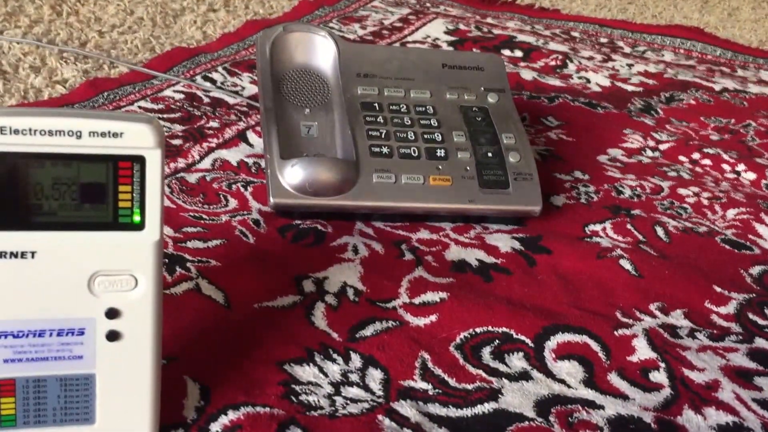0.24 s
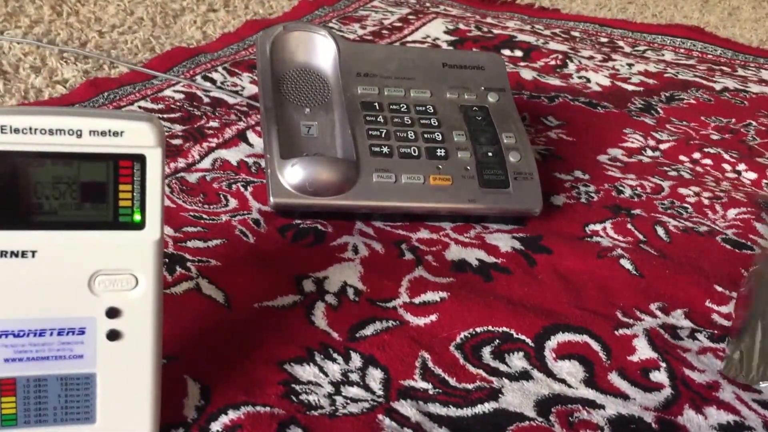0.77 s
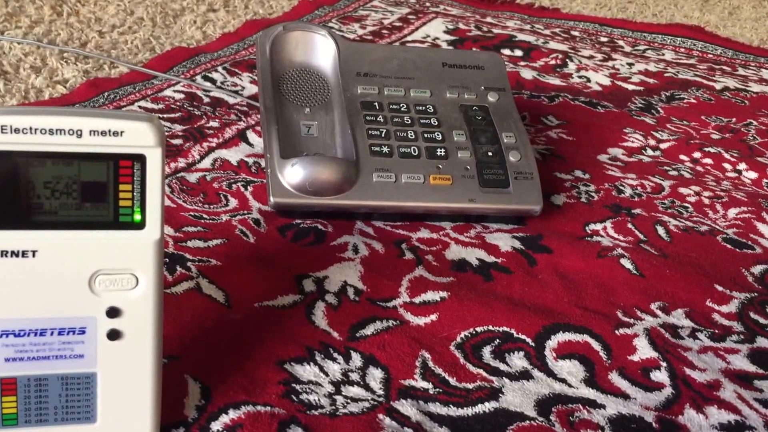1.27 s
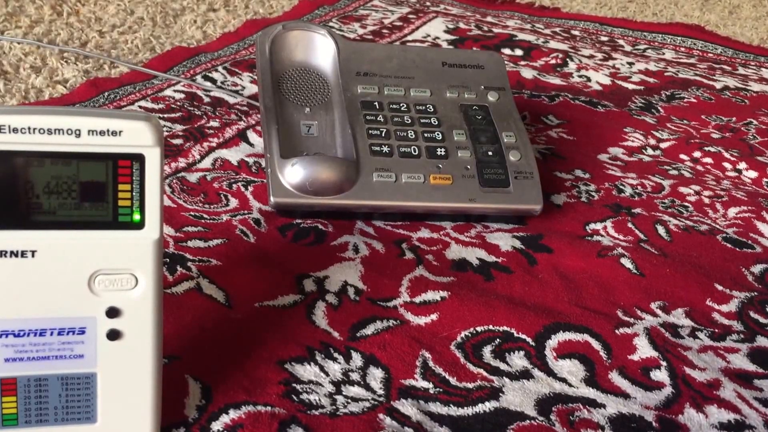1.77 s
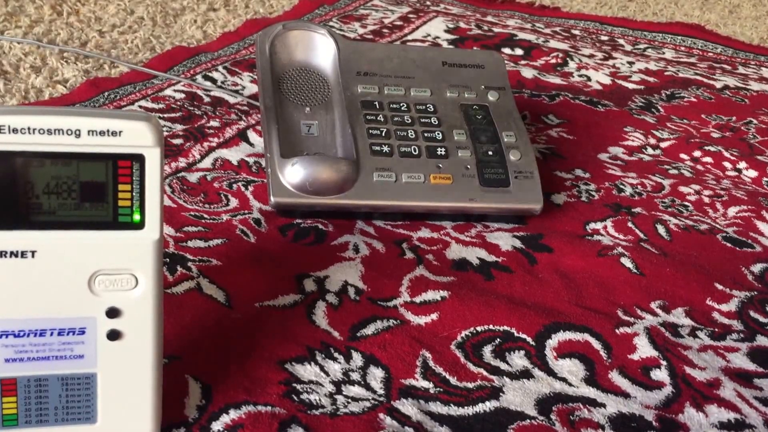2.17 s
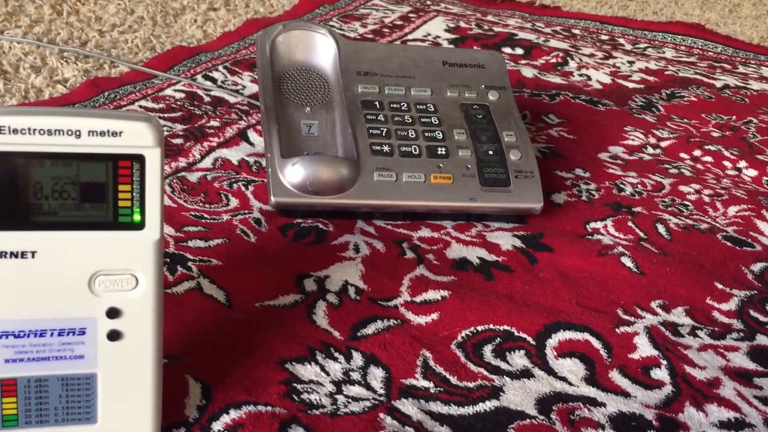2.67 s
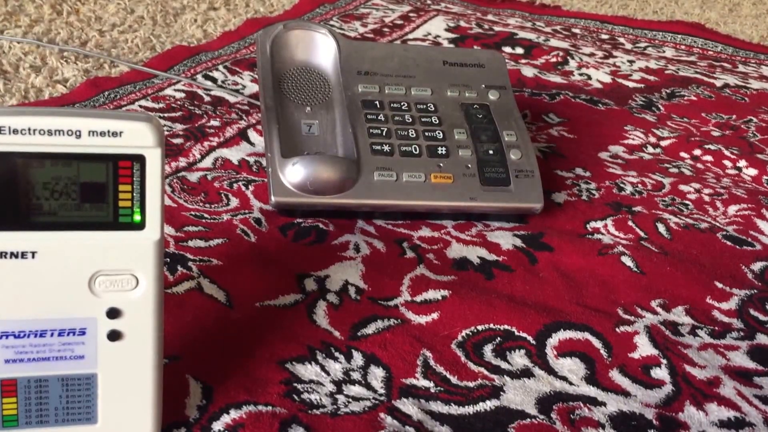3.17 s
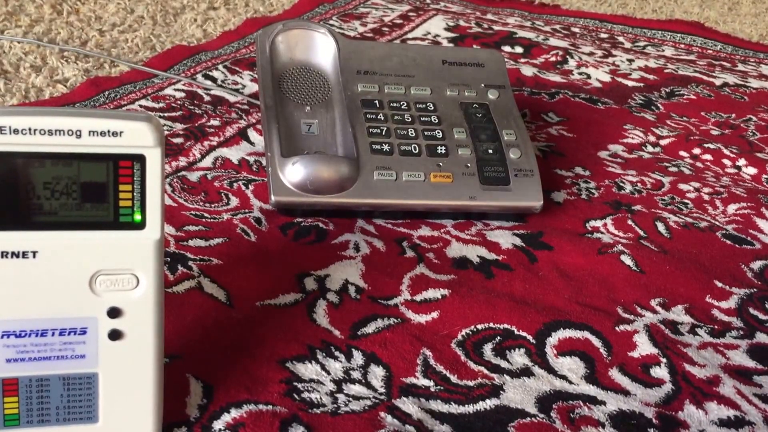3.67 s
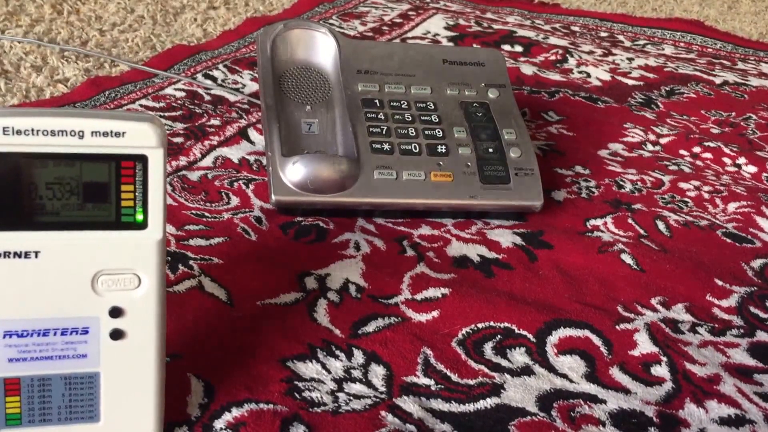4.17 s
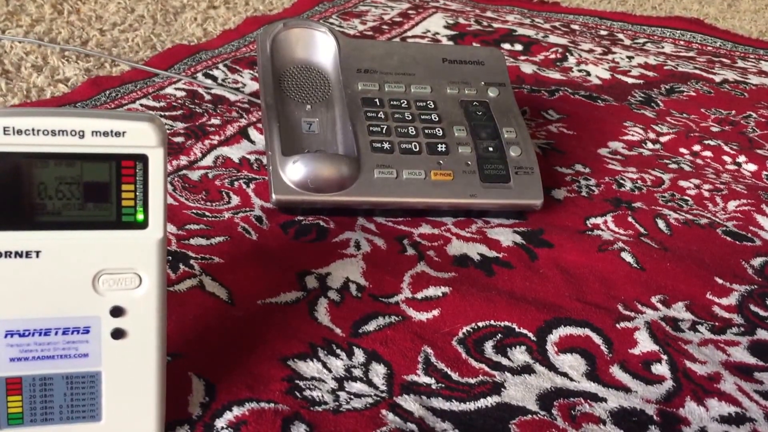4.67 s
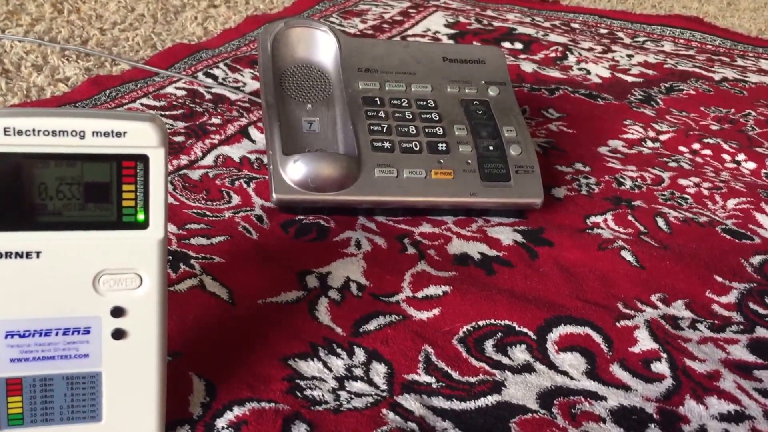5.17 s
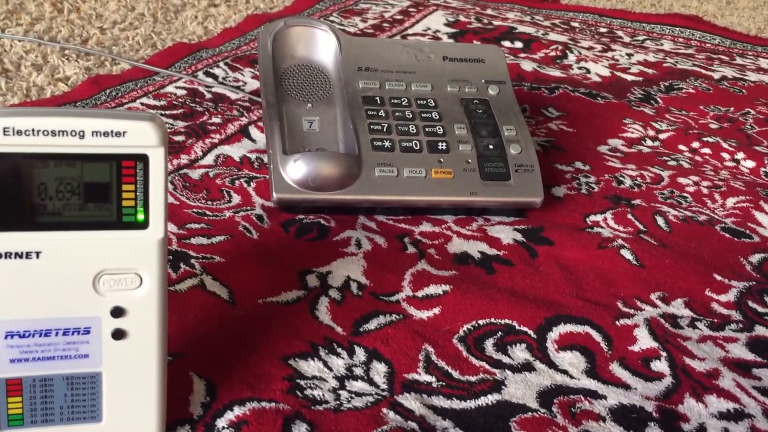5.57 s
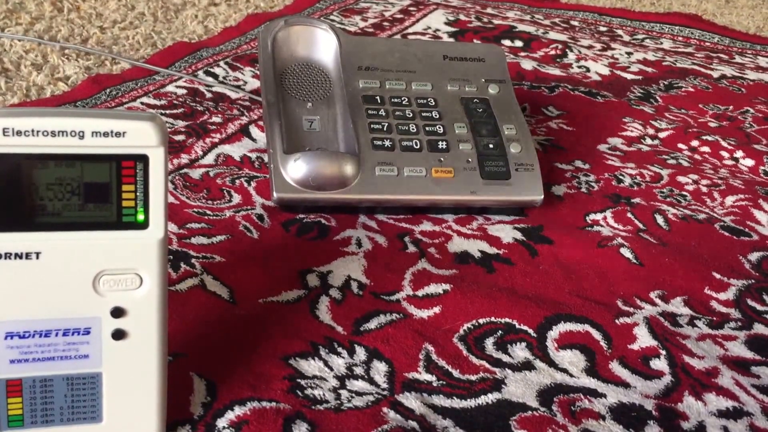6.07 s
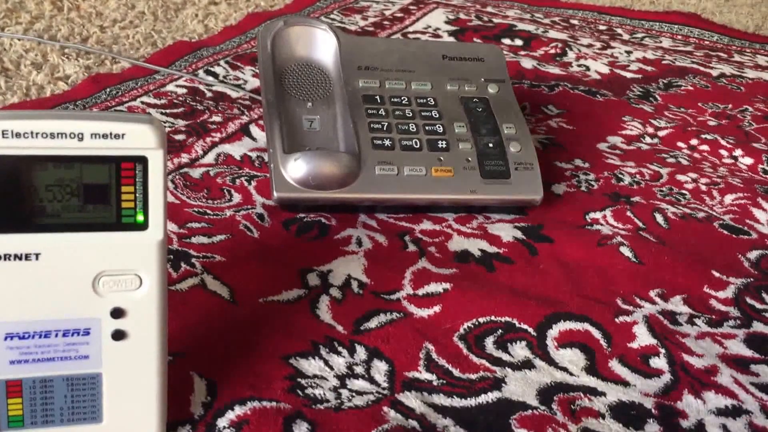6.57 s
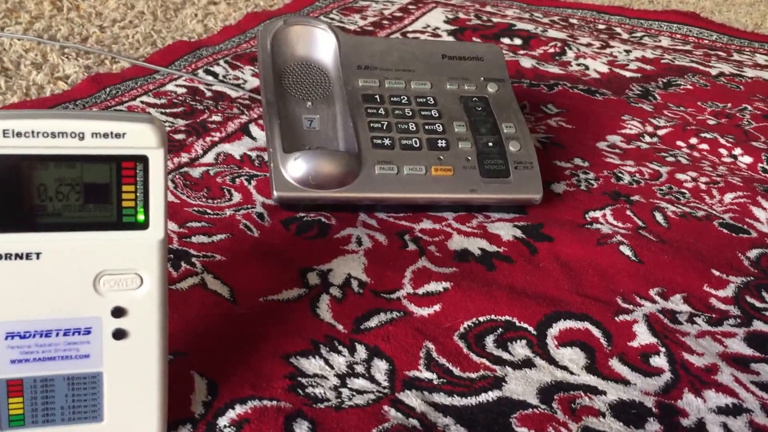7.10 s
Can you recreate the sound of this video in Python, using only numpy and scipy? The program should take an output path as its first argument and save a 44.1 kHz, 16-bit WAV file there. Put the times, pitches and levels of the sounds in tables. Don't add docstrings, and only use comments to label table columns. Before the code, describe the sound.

A thin metallized plastic blanket is shaken open by hand, close to a small microphone in a soft, carpeted room. From 0 s it crinkles lightly, with tiny ticks and a few flicks around 0.4-0.8 s. A sharp surge of snapping peaks just before 1 s, then uneven rustling continues with scattered pops to about 2.3 s. From 2.4 to 3 s the sheet is quieter, in short finger flicks. A bright fold cracks at 3.2 s, and a strong, full shake swells around 3.6 s with soft humming of stretched film, easing through 4.2 s. Smaller pulls follow until another big shake near 5.9 s, with low air thumps and the loudest pop at 6 s. Crackling then thins, with deep soft puffs near 6.8 s and a fresh crinkle at 7 s, still rustling at the end. Echo is short and faint; slight rumble and hiss lie underneath.

```python
import sys
import numpy as np
from scipy import signal
from scipy.fft import rfft, irfft, next_fast_len
from scipy.io import wavfile
from scipy.ndimage import uniform_filter1d, map_coordinates

SR = 44100
rng = np.random.default_rng(int(sys.argv[2]) if len(sys.argv) > 2 else 0)


def level_to_linear(level):
    exponent = np.asarray(level, float) / 20
    return 10 ** exponent


def store_pcm(level_fs):
    pcm = np.round(np.clip(level_fs, -1, 1) * 32767).astype(np.int16)
    wavfile.write(sys.argv[1], SR, np.atleast_2d(pcm).T)


N = 323694

# pitch_hz, level_db [dB per Hz]
FOIL_COLOUR = [(210, -34), (350, -11.5), (502, -17), (912, -1.5), (1510, -2.5), (2030, -4.5), (4890, -4.5),
               (8880, -4.5), (10400, -8), (12000, -8), (14900, -10)]
# time_s, tension [0 slack to 1 tight], extra_brightness_db of the finest folds,
# swing_db of the moving air
HOLD_OVER_TIME = [(0, .9, 2, 0.5), (.4, 1, -1.5, 2), (.6, 0.5, 0.5, 3.5), (1.2, 0.4, 0, -4),
                  (2.1, 0.3, -1, -4.5), (2.35, 0.6, 0, 0), (2.5, 0.1, 2, -0.5), (3, 0.14, 0.5, -2.5),
                  (3.6, 0.4, -0.5, 2.5), (4.4, 0.3, -0.5, 1), (4.8, 1, 0, 0.5), (5.5, 1, 0, 1),
                  (6.1, 0.8, 0.5, 5.5), (6.5, 0.54, 2.5, -0.5), (6.9, 0.85, 3, 7), (7.34, 1, -0.5, 3.5)]
# pitch_hz, width_hz, level_db
PANEL_RINGING = [(1990, 170, 5), (2550, 900, 5.5)]
SLACK_HZ, SPLIT_HZ = 1666, 3570


def unit(x):
    return x / np.sqrt(np.mean(x ** 2) + 1e-20)


def along(points, hz):
    f, v = np.transpose(points)
    return np.interp(np.log(hz + 1), np.log(f + 1), v)


def curves(rows):
    s, *columns = np.transpose(rows)
    return [np.interp(np.arange(N) / SR, s, column) for column in columns]


def wobble(rate_hz):
    knots = rng.standard_normal(int(N * rate_hz / SR) + 4)
    return map_coordinates(knots, [np.arange(N) * rate_hz / SR])


def coloured(x, spectrum, side=lambda hz: 1):
    m = next_fast_len(N + 8192)
    hz = np.fft.rfftfreq(m, 1 / SR)
    gain = level_to_linear(along(spectrum, hz)) * side(hz)
    cepstrum = irfft(np.log(gain + 1e-6), m)
    cepstrum[1:m // 2] *= 2
    cepstrum[m // 2 + 1:] = 0
    return irfft(rfft(x, m) * np.exp(rfft(cepstrum)), m)[:N]


def below(hz, edge_hz=SPLIT_HZ):
    return 1 / np.sqrt(1 + (hz / edge_hz) ** 12)


def above(hz, edge_hz=SPLIT_HZ):
    return np.sqrt(1 - below(hz, edge_hz) ** 2)


def patchy_noise(patchy_db):
    z = signal.stft(rng.standard_normal(N), nperseg=256)[2]

    def patches(wide, long):
        across_pitch = uniform_filter1d(rng.standard_normal(z.shape), wide, 0)
        return unit(uniform_filter1d(across_pitch, long, 1))

    field = patches(4, 4) + patches(6, 40)
    return unit(signal.istft(z * level_to_linear(patchy_db * field), nperseg=256)[1][:N])


def grains(count, size, lo_hz, hi_hz, cycles, spread_db, bustle):
    when, pitch, loud, life, phase = rng.random((count, 5)).T[:, :, None]
    crowd = np.cumsum(bustle)
    start = np.searchsorted(crowd, when * crowd[-1])
    hz = lo_hz + pitch * (hi_hz - lo_hz)
    t = np.arange(size) / SR
    decay = hz / (cycles * (0.22 + 0.87 * life))
    level_db = np.minimum(-spread_db * np.log(loud), 4 * spread_db)
    strength = level_to_linear(level_db) * np.sqrt(decay)
    rings = strength * np.exp(-decay * t) * np.sin(2 * np.pi * (hz * t + phase))
    places = start + np.arange(size)
    return unit(np.bincount(places.ravel(), rings.ravel(), N + size)[:N])


def hands():
    # peak_s, level_db, rise_s, fall_s (over about 10 dB), slackness_db
    pulls = [(0.0, -52, .1, 0.13, -1.5), (.105, -70, 0.12, 0.4, -1), (.5, -48.5, 0.15, .16, 1),
             (.988, -35, .13, .025, 1.5), (1.045, -46, .08, 0.1, -4), (1.25, -43.5, .17, 0.41, 3.5),
             (1.84, -46.5, 0.34, 0.55, 1.5), (2.035, -38.5, 0.11, .08, 4), (2.31, -43, 0.1, 0.2, 0.5),
             (3.08, -45.5, 0.13, 0.1, 0.5), (3.3, -42, 0.14, .045, 6), (3.635, -32.5, 0.21, 0.28, -3),
             (3.93, -36.5, 0.17, 0.256, 0), (4.39, -42, 0.15, 0.12, 1), (4.74, -43.5, 0.16, 0.43, -1.5),
             (5.22, -47, 0.38, .3, -1.5), (5.375, -40.5, .045, .09, -0.5), (5.6, -40.5, .3, 0.17, -1.5),
             (5.87, -32.5, 0.21, 0.2164, -3), (6.14, -40, 0.26, .25, 0.5), (6.41, -41.5, 0.061, .035, 6.5),
             (6.61, -48.5, 0.19, 0.05, 7), (6.72, -47.5, 0.13, 0.2, 0), (7.0, -42, 0.057, 0.38, -2)]
    # peak_s, level_db, slackness_db
    flicks = [(.385, -54, 2), (0.584, -47.5, 6), (.71, -51.5, 3), (0.793, -49.5, 6.5), (1.31, -63, 8),
              (1.61, -46.5, 7), (2.06, -53, 10), (2.27, -49, 20), (2.455, -49, -1), (2.53, -61, -13),
              (2.598, -50, 0), (2.67, -51.5, 0), (2.725, -46.5, -2), (2.77, -53, -5), (2.82, -51, 4.5),
              (2.87, -52.5, -3), (3.0, -53.5, -1), (3.15, -51, 21), (4.14, -39, -10), (4.21, -42, -1),
              (4.28, -46, -20), (4.78, -61, 1), (4.981, -46.5, 2), (5.62, -43, 10), (5.99, -37.5, 2),
              (6.025, -36.5, 4), (6.17, -40, -2), (6.955, -48, -6), (7.24, -51.5, 6), (7.31, -45.5, -4)]
    flick_rise_s, flick_fall_s, roundness = 0.037, 0.031, 1.42
    t = np.arange(0, N + 64, 64) / SR
    moves = pulls + [(s, db, flick_rise_s, flick_fall_s, slack) for s, db, slack in flicks]
    s, db, rise, fall, slack_db = np.transpose(moves)[:, :, None]
    away = np.abs(t - s) / np.maximum(np.where(t < s, rise, fall), .005)
    power = level_to_linear(2 * (db - 10 * away ** roundness)) + 1e-12
    total = power.sum(axis=0)
    effort_db = 45 + 10 * np.log10(total)
    slackness_db = (power * slack_db).sum(axis=0) / total
    return curves(np.transpose([t, effort_db, slackness_db]))


def rustle():
    effort_db, slackness_db = hands()
    slack_db = -57 + 1.15 * effort_db + slackness_db
    taut_db = -49 + 0.93 * effort_db + 0.32 * slackness_db
    tension, bright_db, _ = curves(HOLD_OVER_TIME)
    avalanche = .8 * wobble(30) + 2.1 * wobble(70) + 2.4 * wobble(220)
    crowding = level_to_linear(1.3 * avalanche)

    pings = grains(count=2000, size=400, lo_hz=505, hi_hz=8140, cycles=10.3, spread_db=3.5, bustle=crowding)
    pops = grains(count=7000, size=240, lo_hz=427, hi_hz=5050, cycles=1.7, spread_db=2.0, bustle=crowding)
    pop_hiss = level_to_linear(7.5 + 0.15 * avalanche) * patchy_noise(patchy_db=0.8)
    pops = pops + level_to_linear(-1.5) * pings + pop_hiss
    ticks = grains(count=20000, size=70, lo_hz=2360, hi_hz=18000, cycles=2.2, spread_db=2.0, bustle=crowding)
    tick_hiss = level_to_linear(3.0 + 0.23 * avalanche) * patchy_noise(patchy_db=1.16)
    ticks = ticks + level_to_linear(-10.5) * pings + tick_hiss

    deep = coloured(pops, FOIL_COLOUR, lambda hz: below(hz, 1420))
    full = coloured(pops, FOIL_COLOUR, lambda hz: below(hz, SLACK_HZ))
    slack = unit(deep + tension * (full - deep))

    def taut_panel(centre_hz, width_hz, db):
        def peak(hz):
            bump = level_to_linear(db * np.exp(-((hz - centre_hz) / width_hz) ** 2))
            return bump * above(hz, SLACK_HZ) * below(hz)
        return unit(coloured(pops, FOIL_COLOUR, peak))

    loose, tight = (taut_panel(*mode) for mode in PANEL_RINGING)
    taut = loose + tension * (tight - loose)
    folds = unit(coloured(ticks, FOIL_COLOUR, above))
    finest = signal.sosfilt(signal.butter(1, 10000, "high", fs=SR, output="sos"), folds)
    folds = folds + (level_to_linear(2 * bright_db) - 1) * finest
    return level_to_linear(slack_db) * slack + level_to_linear(taut_db) * taut + level_to_linear(effort_db - 45.5) * folds


def snaps():
    # start_s, peak_db, pop_hz, crack_db
    panel_pops = [(.437, -31, 2550, -9.5), (.544, -26.5, 1740, -15), (.576, -18, 1940, -31),
                  (0.585, -23, 1840, -32), (.704, -34, 1720, -21), (.777, -28, 1960, -10.5),
                  (.939, -19, 2680, -17), (0.958, -19, 1960, -20), (.979, -21.5, 2100, -21),
                  (1.167, -32.5, 970, -8.5), (1.297, -26, 2120, -31), (1.583, -27, 1200, -26),
                  (1.611, -24, 2720, -16), (1.791, -25.5, 3080, -15.5), (1.834, -24, 1930, -28),
                  (1.996, -24, 2710, -23.5), (2.018, -25.5, 1990, -11.5), (2.307, -21.5, 2380, -15),
                  (2.325, -22, 2870, -19), (3.106, -28.5, 2920, -10), (3.524, -26.5, 1250, -7),
                  (3.935, -29, 2860, -9), (4.202, -22.5, 2970, -21), (4.384, -23, 2500, -15),
                  (5.534, -21, 2600, -14), (5.988, -11.5, 1990, -33), (6.112, -20, 2620, -15),
                  (6.242, -21, 1830, -18), (6.299, -26, 2050, -23), (6.443, -31, 1920, -9)]
    # start_s, peak_db, pop_db
    fold_cracks = [(.382, -28.5, -11.5), (.418, -29, -30), (.839, -37, -15), (.876, -27, -16),
                   (1.067, -24.5, -12), (1.211, -22, -14), (1.41, -26.5, -11), (1.718, -22.5, -15),
                   (2.591, -31.5, -27), (2.72, -32, -9), (3.068, -20.5, -24), (3.191, -13, -17.5),
                   (3.223, -26, -13), (3.315, -20.5, -7.5), (3.371, -34, -1), (4.517, -29, -11),
                   (4.707, -22.5, -11), (4.78, -30, -16), (5.167, -27, -8), (5.266, -27, -28),
                   (5.356, -24, -1.5), (5.618, -19.5, -8), (5.663, -24, -9), (6.164, -21, -16),
                   (6.177, -15.5, -12), (6.53, -29.5, -9), (6.598, -21.5, -12.5), (6.719, -26.5, -9),
                   (6.949, -24.5, -8.5), (7.275, -22, -10.5)]
    # start_s, peak_db
    small_ticks = [(.093, -29.5), (.105, -34), (.159, -55), (.196, -45), (.223, -39.5), (.229, -35),
                   (.25, -31), (.301, -32.5), (.352, -49), (.587, -34), (.855, -31), (0.992, -19),
                   (1.574, -22), (1.826, -29), (2.26, -41), (2.312, -21.5), (3.564, -34), (3.583, -24),
                   (3.83, -33), (4.57, -36), (4.693, -33), (5.345, -30), (5.594, -37), (6.218, -24),
                   (6.38, -29.5), (6.452, -35), (6.619, -23), (6.63, -22.5), (6.685, -23.5), (7.01, -28)]
    tension = curves(HOLD_OVER_TIME)[0]
    loose_hz, tight_hz = PANEL_RINGING[0][0], PANEL_RINGING[1][0]

    def pitch(s):
        return loose_hz + tension[round(s * SR)] * (tight_hz - loose_hz)

    # start_s, peak_db, pop_hz, pop_db, crack_db
    creases = [(s, db, hz, -5.5, crack_db) for s, db, hz, crack_db in panel_pops]
    creases += [(s, db, pitch(s), pop_db, -14) for s, db, pop_db in fold_cracks]
    creases += [(s, db, pitch(s), -13.5, -17.5) for s, db in small_ticks]
    pops, cracks = np.zeros(N + SR), np.zeros(N + SR)
    t = np.arange(SR // 30) / SR
    for s, db, hz, pop_db, crack_db in creases:
        t60_s = 0.0085 * level_to_linear(0.14 * (db + 36.5))
        burst = level_to_linear(-60 * t / t60_s) * (1 - np.exp(-t / (0.069 * t60_s)))
        tear, crack = rng.standard_normal((2, len(t)))
        dullness = rng.uniform(-0.46, 0.95)
        crack = burst * (crack + dullness * np.roll(crack, 1))
        panel = np.sin(2 * np.pi * hz * t) * np.exp(-hz * t / 1.64)
        pop = np.convolve(tear * burst ** 0.44, panel)[:len(t)]
        place = slice(round(s * SR), round(s * SR) + len(t))
        pops[place] += level_to_linear(db + pop_db + 4.5) * pop / np.abs(pop).max()
        cracks[place] += level_to_linear(db + crack_db + 17.5) * crack / np.abs(crack).max()
    pops = coloured(pops[:N], [(300, -22.5), (900, -5.5)])
    return pops + coloured(cracks[:N], FOIL_COLOUR, above)


def billow():
    # pitch_hz, level_db [dB per Hz]
    air_colour = [(26, -40), (45, -8), (102, 2), (184, 1), (307, -4), (339, -6.5), (480, -12), (620, -62),
                  (1060, -120)]
    # time_s, peak_db, pitch_hz
    air_pushes = [
        (2.808, -50, 134),
        (4.198, -56, 130),
        (4.989, -53, 61.3),
        (5.619, -64, 128),
        (5.869, -40, 63),
        (5.969, -46, 105),
        (6.395, -47, 111),
        (6.779, -42.5, 56.5),
        (6.849, -42, 45.8),
    ]
    effort_db, slackness_db = hands()
    push_db = uniform_filter1d(effort_db + slackness_db, size=round(0.025 * SR))
    swing_db = curves(HOLD_OVER_TIME)[2]
    billow_db = -64.5 + 0.81 * push_db + swing_db
    warbles = grains(count=800, size=2000, lo_hz=52.6, hi_hz=526, cycles=4.5, spread_db=2.0, bustle=np.ones(N))
    rush = unit(coloured(warbles + level_to_linear(7.5) * patchy_noise(patchy_db=5.5), air_colour))
    pushes, t = np.zeros(N + SR), np.arange(SR // 8) / SR
    for s, db, hz in air_pushes:
        swell = t / 0.018 * np.exp(1 - t / 0.0078)
        push = np.sin(2 * np.pi * hz * t) * swell
        pushes[round((s - .006) * SR):][:len(t)] += level_to_linear(db + 1.0) * push
    return level_to_linear(billow_db) * rush + pushes[:N]


def drumming():
    # start_s, end_s, first_hz, last_hz, level_db
    stretches = [
        (3.5, 3.77, 341, 337, -56),
        (3.793, 3.872, 280, 233, -53),
        (3.885, 4.015, 200, 184, -58),
        (5.815, 6.033, 265, 252, -55.5),
        (6.21, 6.424, 190, 188, -57.5),
        (7.056, 7.22, 196.7, 184, -61),
    ]
    t, hum = np.arange(N) / SR, np.zeros(N)
    shake, waver = level_to_linear(2.3 * wobble(30)), 1 + 0.0253 * wobble(25)
    for start, end, first_hz, last_hz, db in stretches:
        part = np.clip((t - start) / (end - start), 0, 1)
        hz = (first_hz + part * (last_hz - first_hz)) * waver
        turns = np.cumsum(hz) / SR
        hum += level_to_linear(db) * np.sin(np.pi * part) ** .5 * np.sin(2 * np.pi * turns)
    return shake * hum


def room(x):
    # pitch_hz, t60_s
    echo_times = [(200, 0.049), (2000, 0.11), (10000, 0.057)]
    wet, block = np.zeros(N + SR), SR // 4
    for start in range(0, N, block):
        hz, t, z = signal.stft(rng.standard_normal(SR // 3), SR, nperseg=256)
        fade = level_to_linear(-60 * t / along(echo_times, hz)[:, None])
        tail = signal.istft(z * fade, SR, nperseg=256)[1]
        answer = signal.fftconvolve(x[start:start + block], tail / np.linalg.norm(tail))
        wet[start + 200:][:len(answer)] += answer
    return wet[:N]


def house():
    # pitch_hz, level_db [dB per Hz]
    rumble_colour = [(15, -72), (25, -19), (45, -10), (75, -1.5), (145, -4), (246, -12), (300, -27),
                     (390, -71), (660, -120)]
    # pitch_hz, level_db [dB per Hz]
    hiss_colour = [(180, -46), (300, -21), (726, 5.5), (991, -17), (2780, -4), (15000, -23)]
    rumble = unit(coloured(rng.standard_normal(N), rumble_colour))
    hiss = unit(coloured(rng.standard_normal(N), hiss_colour))
    return level_to_linear(-69 + 2.1 * wobble(4.84)) * rumble + level_to_linear(-78) * hiss


def scene():
    foil = rustle() + snaps()
    air = billow() + drumming()
    return (foil + level_to_linear(-13.0) * room(foil) + air + house())[None]


def low_pass(x):
    return signal.sosfilt(signal.butter(12, 16510, fs=SR, output="sos"), x)


def record(dry):
    # centre_hz, width_hz, level_db
    treble_dips = [
        (4900, 140, -3),
        (7660, 660, -2.5),
        (10420, 230, -5),
    ]
    hz = np.fft.rfftfreq(N, 1 / SR)
    dips_db = sum(db * np.exp(-((hz - centre) / width) ** 2) for centre, width, db in treble_dips)
    limit_db = np.interp(hz, 15430 + np.array([-100, 50, 600, 1200]), [0, -25, -50, -70])
    gain = level_to_linear(dips_db + limit_db) * above(hz, 36)
    mix = irfft(rfft(dry) * gain, N)
    return low_pass(mix)


dry = scene()
out = record(dry)
store_pcm(out)
```